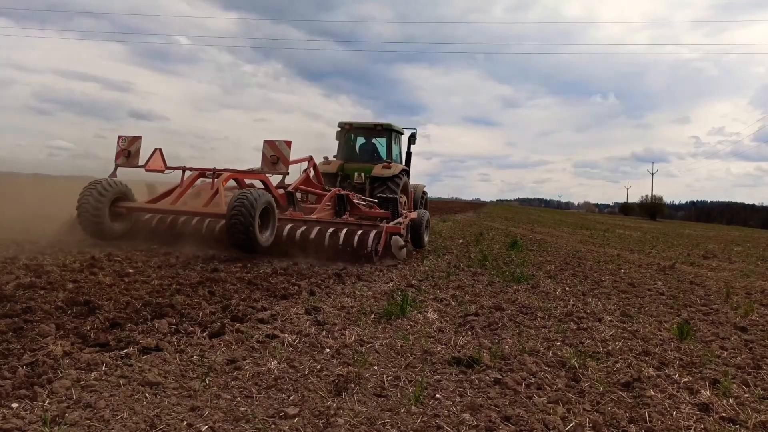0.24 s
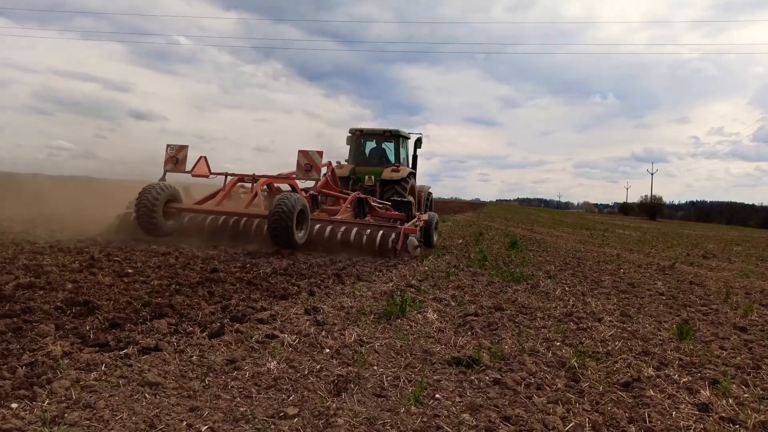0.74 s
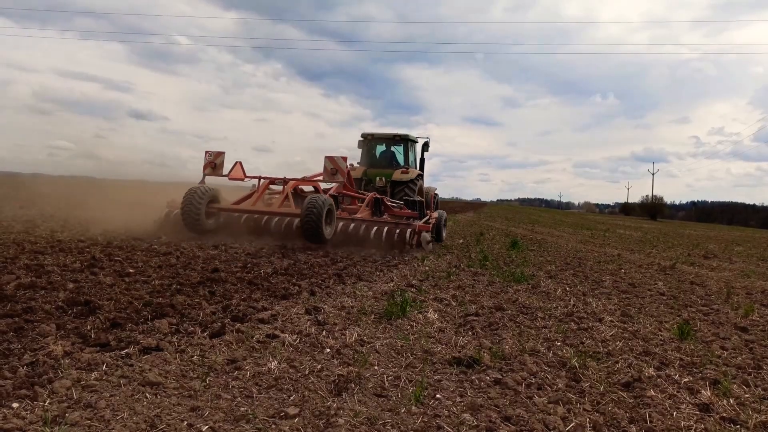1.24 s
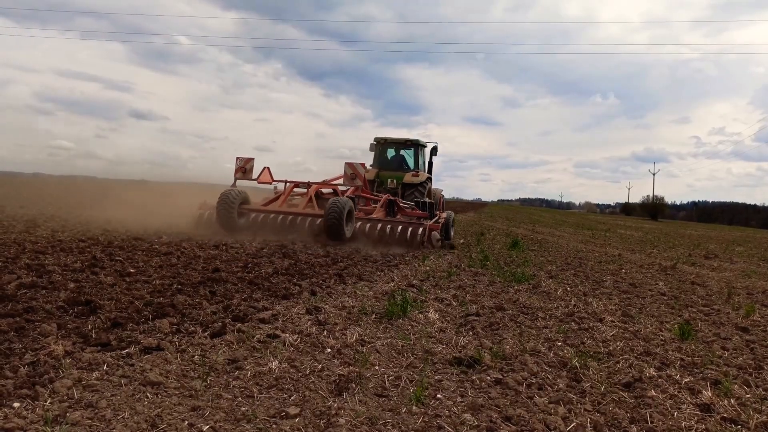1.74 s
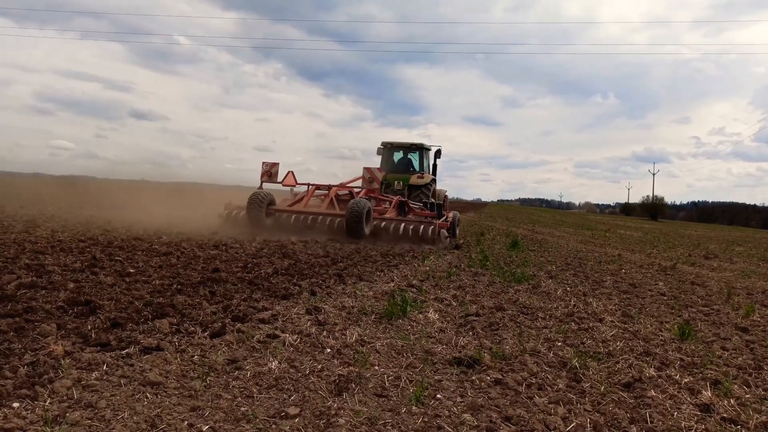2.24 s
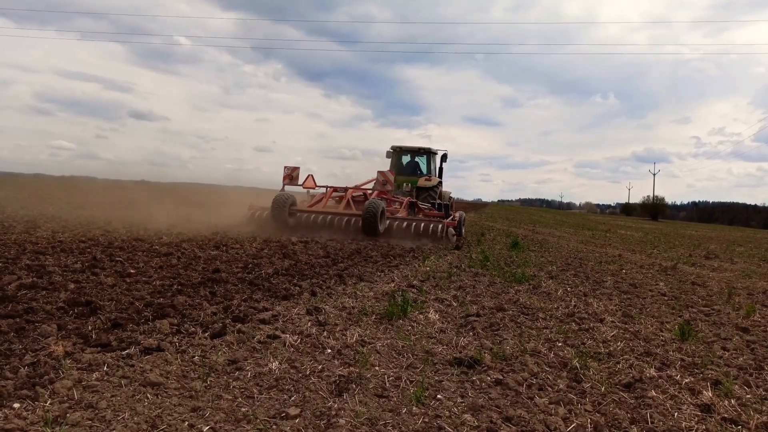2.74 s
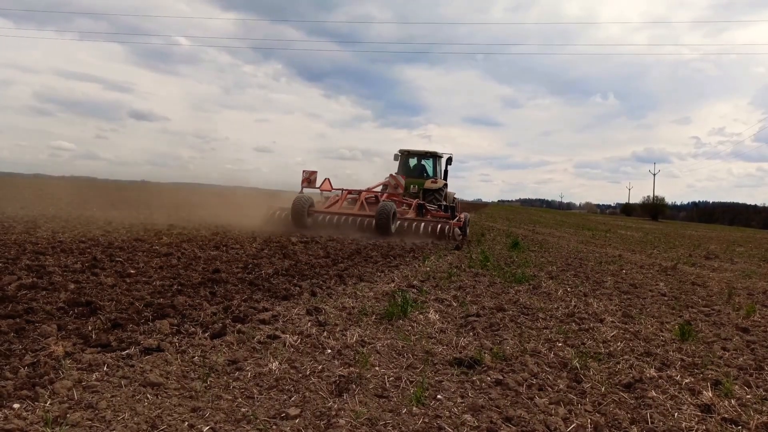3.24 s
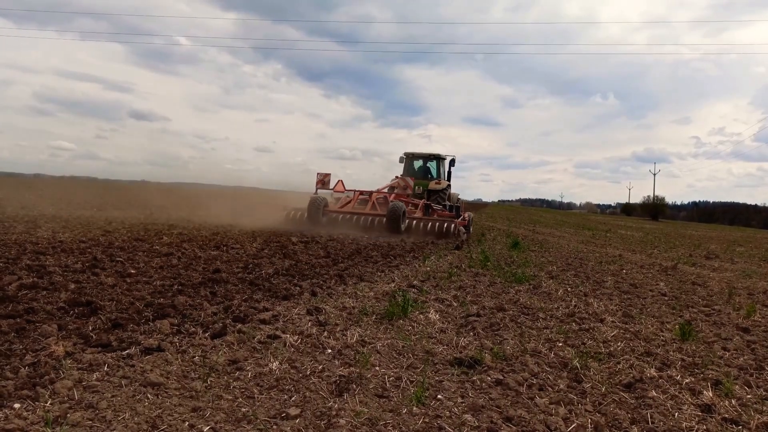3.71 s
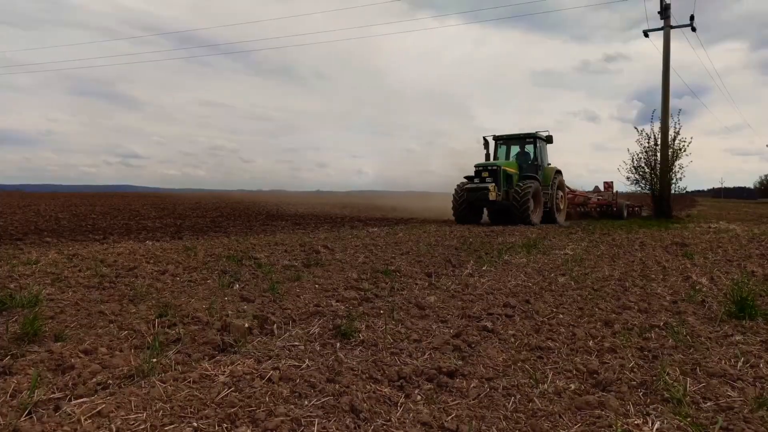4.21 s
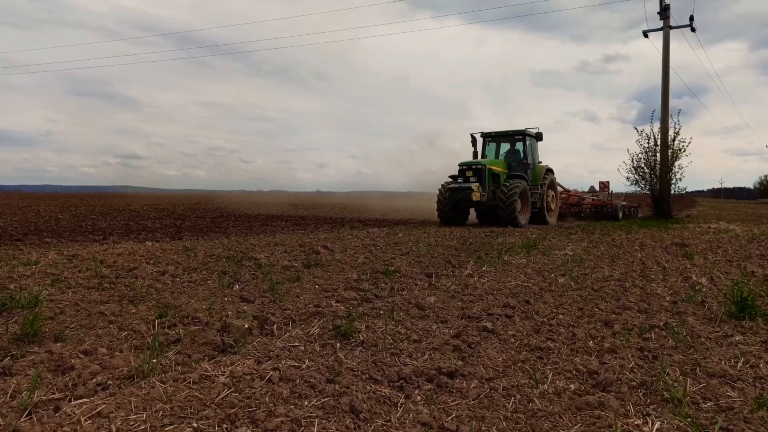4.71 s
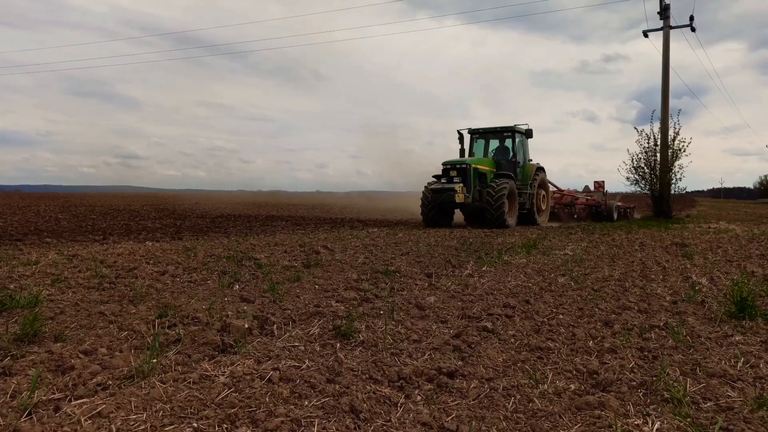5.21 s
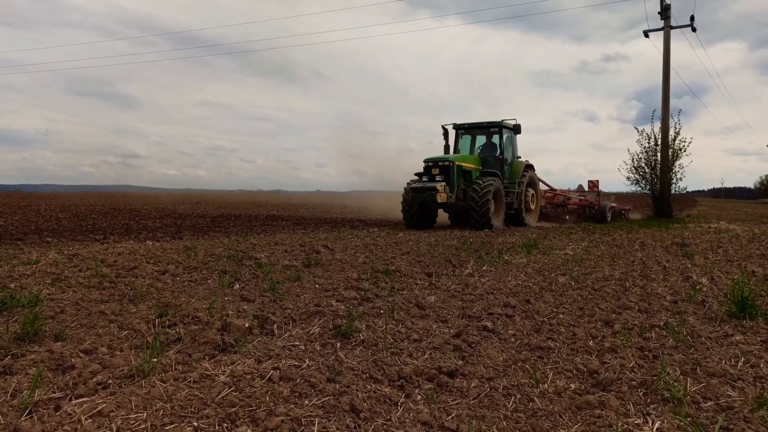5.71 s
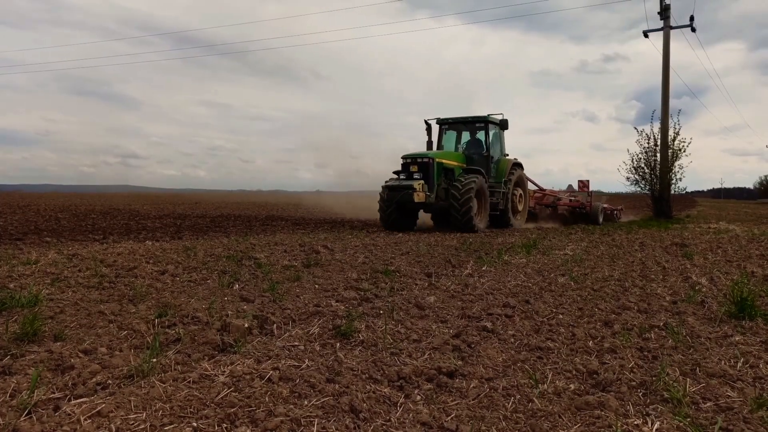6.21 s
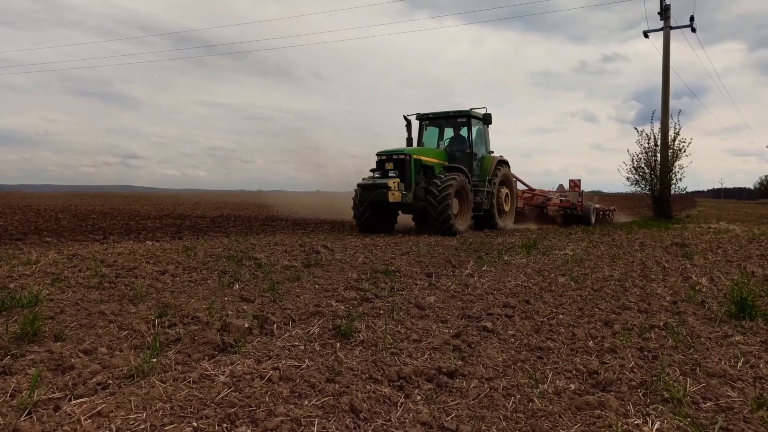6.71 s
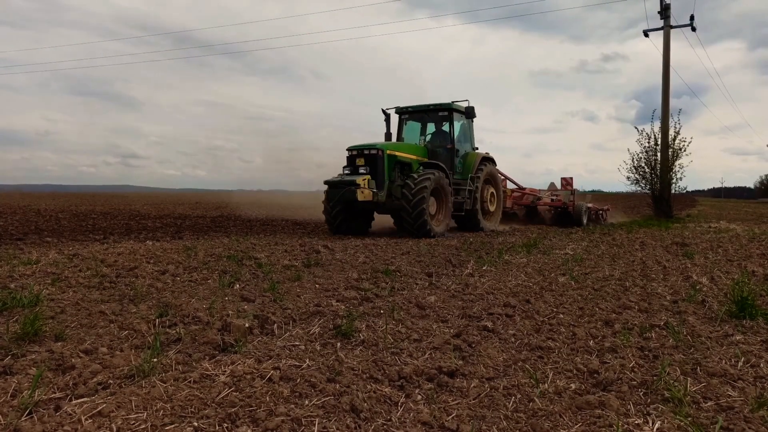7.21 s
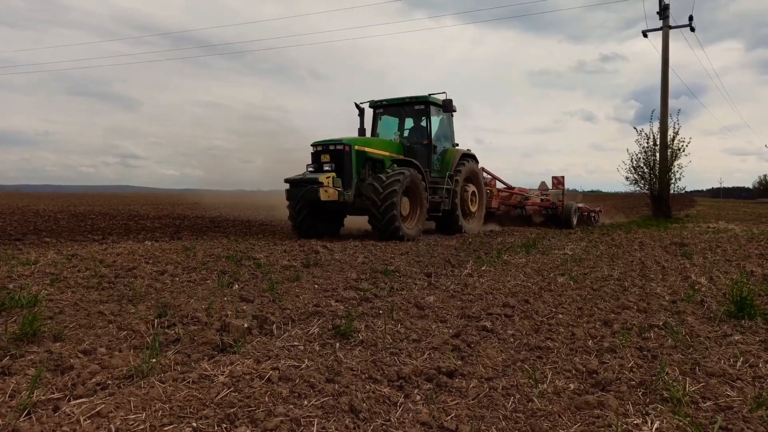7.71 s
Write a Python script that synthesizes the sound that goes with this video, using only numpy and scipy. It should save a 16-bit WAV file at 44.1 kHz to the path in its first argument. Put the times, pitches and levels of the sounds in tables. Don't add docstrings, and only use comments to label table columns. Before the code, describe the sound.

A diesel tractor drones away, stones clanking on its steel discs in buffeting wind, then after a brief silence it fades back in, approaching with a fuller roar.

```python
import sys
import numpy as np
from scipy import signal
from scipy.io import wavfile
from scipy.ndimage import uniform_filter1d

SR = 44100
rng = np.random.default_rng(int(sys.argv[2]) if len(sys.argv) > 2 else 0)


def makeup_ratio(level_db):
    decades = np.asarray(level_db, float) / 20
    return 10 ** decades


def wrap_up_sound(samples):
    columns = np.atleast_2d(samples).T
    tamed = np.clip(columns, -1, 1)
    steps = np.round(tamed * 32767).astype(np.int16)
    wavfile.write(sys.argv[1], SR, steps)


N = 350595
TIME = np.arange(N) / SR
CUT_S, BACK_S = 3.778, 4.014
LEAVING = TIME < CUT_S


def evened(x):
    return x / np.sqrt(np.mean(abs(x) ** 2) + 1e-20)


def read(points, hz):
    f, value = np.transpose(points)
    return np.interp(np.log(hz + 1), np.log(f + 1), value)


def curves(tables):
    s, *columns = np.transpose(np.vstack(tables))
    return [np.interp(TIME, s, c) for c in columns]


def wander(hz):
    low_pass = signal.butter(2, hz, fs=SR / 32, output="sos")
    steps = signal.sosfilt(low_pass, rng.standard_normal(N // 32 + 1))
    return np.interp(np.arange(N) / 32, np.arange(len(steps)), evened(steps))


def band_pass(x, low_hz, high_hz):
    return signal.sosfilt(signal.butter(2, [low_hz, high_hz], "bandpass", fs=SR, output="sos"), x)


# time in seconds, lag of the left port in samples.
LAG = [(0, 1.5), (1.5, 2), (3.7, 2), (4.1, 3.5), (5.501, 3), (6.7, -0.5), (7.2, 1), (7.901, -1.5)]
# frequency in Hz, likeness from 0 to 1.
LIKENESS = [(100, 1), (1000, 0.99), (3000, 0.79), (7000, 0.63), (13000, 0.63)]
# frequency in Hz, width in Hz, gain in dB.
PANELS = [(712, 28, 3), (1410, 35, 3), (1916, 205, 5), (2463, 43, 5.5), (2676, 37, 6), (3941, 30, 4.5),
          (4688, 46, 8)]


def noise(spectrum, like, patchy_db, size):
    frames, hz = 4 * N // size + 5, np.fft.rfftfreq(size, 1 / SR)
    a, b, c, d, patches = rng.standard_normal((frames, len(hz), 5)).T
    patches = uniform_filter1d(patches, size=len(hz) // 40, axis=0)
    patches = evened(uniform_filter1d(patches, size=8192 // size, axis=1))
    lag = np.interp(np.arange(frames) * size / 4 / SR, *np.transpose(LAG))
    same = np.clip(like * read(LIKENESS, hz), -1, 1)[:, None]
    right = a + 1j * b
    left = same * right + np.sqrt(1 - same ** 2) * (c + 1j * d)
    left = left * np.exp(-2j * np.pi * np.outer(hz, lag) / SR)
    panels_db = sum(db / (1 + ((hz - f) / width) ** 2) for f, width, db in PANELS)
    colour_db = read(spectrum, hz) + panels_db
    z = np.array([left, right]) * makeup_ratio(colour_db[:, None] + patchy_db * patches)
    return evened(signal.istft(z, nperseg=size, noverlap=3 * size // 4)[1][:, :N])


# time in seconds, level in dB.
WIND = [(0, -27.5), (.41, -31), (.61, -21.5), (.82, -32.5), (1.02, -26.5), (1.3, -30), (2.04, -27),
        (2.24, -30.5), (2.6, -26), (3.2, -24.5), (3.67, -29.5), (4.5, -29.5), (5, -32.5), (6.12, -35),
        (6.53, -29), (6.75, -35), (7.15, -34.5), (7.4, -26)]
# frequency in Hz, level in dB per Hz.
BUFFET = [(30, -22), (64, -20.5), (78, 1), (130, 3.5), (200, -1), (350, -25), (600, -35.5), (3000, -58)]
# frequency in Hz, level in dB per Hz.
GUST = [(60, -33.5), (150, -13.5), (250, 10.5), (400, -2.5), (600, -19.5), (1200, -37), (3000, -51.5)]
LAST_GUST_S, LAST_GUST_DB_PER_S = 7.58, 12.5
GUST_DB, GUST_GROWTH = -8.5, 1.5


def wind():
    buffet_db = curves([WIND])[0] + LAST_GUST_DB_PER_S * np.maximum(TIME - LAST_GUST_S, 0)
    gust_db = buffet_db + GUST_DB + (GUST_GROWTH - 1) * (buffet_db + 30)
    buffet_lumps = np.clip([wander(34), wander(11)], -3, 1.6)
    gust_lumps = np.clip([wander(30), wander(27)], -3, 1.4)
    buffeting = makeup_ratio(buffet_db + 4 + 2.2 * buffet_lumps) * noise(BUFFET, 0.029, 1.5, size=2048)
    gusts = makeup_ratio(gust_db + 1.5 + 3.9 * gust_lumps) * noise(GUST, 0.05, 2.3, size=512)
    return buffeting + gusts


# time in seconds, level in dB, length in seconds, port (1 left, -1 right).
SLAPS = [(0.074, -18.5, 0.0052, -1), (0.291, -13.5, 0.0043, -1), (0.583, -26, 0.031, 1),
         (0.871, -18.5, 0.0083, -1), (1.078, -16.5, 0.017, 1), (1.327, -21, 0.026, -1),
         (1.377, -19, 0.021, -1), (1.433, -11.5, 0.0062, -1), (1.789, -10.5, 0.006, -1),
         (1.824, -27.5, 0.0085, -1), (1.93, -23, 0.012, -1), (1.999, -20.5, 0.02, -1),
         (2.531, -14, 0.032, 1), (2.606, -10, 0.02, 1), (2.643, -12, 0.013, 1), (2.828, -15, 0.019, 1),
         (3.089, -25.5, 0.024, -1), (3.248, -18, 0.0078, 1), (3.362, -20, 0.026, -1),
         (4.571, -12.5, 0.0052, -1), (4.61, -23, 0.013, -1), (5.386, -21, 0.009, 1),
         (6.636, -20, 0.012, -1), (7.367, -10, 0.022, -1), (7.62, -13.5, 0.044, -1),
         (7.916, -9, 0.0079, -1)]
SHELTER_DB = -17.5


def wind_slaps():
    rush = band_pass(rng.standard_normal((2, N)), 190, 500)
    rush /= np.sqrt(uniform_filter1d(rush ** 2, size=500))
    swells = np.zeros((2, N))
    for s, db, length, port in SLAPS:
        near = slice(round((s - 3 * length) * SR), round((s + 3 * length) * SR))
        ports = makeup_ratio(db - 1.35 + SHELTER_DB * np.array([[port < 0], [port > 0]]))
        swells[:, near] += ports * np.exp(-((TIME[near] - s) / (0.92 * length)) ** 2)
    return swells * rush


# frequency in Hz, level in dB, decay by 60 dB in seconds.
DISC = [(1935, -5, 0.1), (2600, -1.5, 0.091), (3100, -4.5, 0.23), (3795, -3, 0.11), (4100, -1.5, 0.18),
        (4450, -12, 0.054), (4520, -4.5, 0.18), (5500, -5.5, 0.1), (6480, -11, 0.4), (6300, -18, 0.053),
        (7720, -3.5, 0.15)]
PEBBLES_PER_S, PEBBLE_DECAY = 26, 0.22


def pebbles():
    t, out = np.arange(2500) / SR, np.zeros((2, N))
    struck = rng.random(N) < PEBBLES_PER_S / SR
    size = makeup_ratio(3.5 * np.minimum(rng.exponential(1, N), 3)) * struck
    for hz, db, t60 in DISC:
        for spread in (0.9, 1.08):
            ring = makeup_ratio(db - 60 * t / (PEBBLE_DECAY * t60)) * np.sin(2 * np.pi * hz * spread * t)
            ring *= np.minimum(t / 0.0026, 1)
            ticks = signal.oaconvolve(size * rng.standard_normal(N), ring)[:N]
            out += ticks * makeup_ratio(rng.uniform(-2.5, 3, (2, 1)))
    return makeup_ratio(-47.5 - 1.3 * TIME) * LEAVING * evened(out)


# time in seconds, peak in dB, loudest ring in Hz, crack against ring in dB,
# decay as a factor.
CLANKS = [(0.0144, -22.5, 3150, 3.5, 0.65), (0.0458, -27, 3980, -1.5, 0.95), (0.225, -47.5, 1980, 17, 0.66),
          (0.3065, -26.5, 6580, 1.5, 0.6), (0.4362, -23.5, 2490, -8.5, 0.65), (0.6145, -27, 2770, 1, 0.85),
          (0.8622, -13, 2370, -9.5, 0.34), (0.9485, -25, 3970, 3, 0.74), (1.2336, -26.5, 6350, -3, 0.6),
          (1.2522, -26, 4340, 4, 0.82), (1.3514, -8, 4420, -6.5, 0.6), (1.3619, -7, 3894, -8.5, 0.5),
          (1.4997, -35.5, 7220, 9, 0.74), (1.6854, -25.5, 2035, -5.5, 0.98),
          (1.6989, -30.5, 2100, 13, 0.98), (1.7143, -21, 2300, -2, 0.98), (1.8893, -44.5, 1800, 10.5, 0.47),
          (2.0004, -34, 2400, 9.5, 0.49), (2.1821, -19.5, 2590, -16.5, 0.37),
          (2.4542, -26.5, 3740, -12.5, 0.6), (2.5024, -23, 2576, -7.5, 0.75),
          (2.9938, -22, 3670, 0.5, 0.36), (3.1515, -29.5, 3800, 3, 0.6), (3.185, -25, 3200, -10.5, 0.42)]
WING_DB, WING_PAST_S, AHEAD_DB = 16, 0.37, -2


def stone_clanks():
    out, t = np.zeros((2, N)), np.arange(9000) / SR
    hz, mode_db, t60 = np.transpose(DISC)[:, :, None]
    soft_db = -2.5 * np.log2(hz / 4000).clip(0)
    for s, db, own_hz, crack_db, decay in CLANKS:
        pan_db = WING_DB if s < WING_PAST_S else AHEAD_DB
        chance = rng.random((2, len(DISC), 1))
        detuned_hz = hz * (1 + 0.05 * (chance[1] - 0.5))
        ring_db = mode_db + soft_db - 10 * chance[0] - 60 * t / t60 / decay
        rings = makeup_ratio(ring_db) * np.sin(2 * np.pi * detuned_hz * t)
        own = makeup_ratio(-60 * t / (0.13 * decay)) * np.sin(2 * np.pi * own_hz * t)
        rubble = rng.standard_normal((2, len(t)))
        crack = band_pass(rubble + 0.33 * rubble[::-1], 1700, 7500)
        crack *= makeup_ratio(crack_db + 8 - 60 * t / (0.1 * decay))
        ports = makeup_ratio(db - 7 + np.array([[0.5], [-0.5]]) * pan_db)
        hit = (rings.sum(0) + own + crack) * np.minimum(t / 0.0016, 1) * ports
        out[:, round(s * SR):][:, :len(t)] += hit
    return out


# start in seconds, length in seconds, pitch in Hz, level in dB,
# octave level in dB.
SQUEAKS = [
    (0.42, .09, 2620, -36.5, -50),
    (.44, .065, 3100, -40.5, -57),
    (1.37, 0.079, 3100, -37, -53.5),
    (1.557, 0.065, 2582, -35.5, -55),
    (1.67, .05, 2170, -27, -34),
    (.14, .03, 1600, -45, -48.5),
    (2.101, 0.034, 3800, -41, -37),
    (2.09, 0.046, 4400, -43, -61),
    (3.262, .035, 3850, -42, -60),
]


def squeaks():
    out = np.zeros(N)
    for s, length, pitch_hz, db, octave_db in SQUEAKS:
        swell = np.sin(np.pi * np.clip((TIME - s) / length, 0, 1)) ** 0.6
        spin = 2 * np.pi * pitch_hz * (TIME - s) + 0.2 * wander(40)
        out += swell * (makeup_ratio(db) * np.sin(spin) + makeup_ratio(octave_db) * np.sin(2 * spin))
    return out


# frequency in Hz, level in dB per Hz.
HISS = [(1200, -20), (2000, -1), (2900, -5.5), (4000, -4), (8000, 16.5), (16000, -9.5)]


def soil_hiss(hiss_db, beat):
    surge_db = np.where(LEAVING, 1.6, 0.8) * wander(23)
    leaving = noise(HISS, 0.45, 2.0, size=512)
    nearing = noise(HISS, 1.0, 3.2, size=512)
    return makeup_ratio(hiss_db + 1.5 + surge_db) * np.where(LEAVING, leaving, nearing) * np.sqrt(beat)


# frequency in Hz, level in dB per Hz.
ROAR = [
    [(40, -12), (65, -5.5), (100, 5), (200, 7), (300, -2.5), (400, 4.5), (560, -2.5), (740, 1.5),
     (1000, -1.5), (1200, -9.5), (1430, -7.5), (1750, -14.5), (2900, -16.5), (8000, -19)],
    [(40, -4), (65, -8.5), (120, 0), (200, -4.5), (280, -0.5), (400, 1), (560, -1.5), (740, 3), (1120, -1),
     (1430, 0), (1750, -5.5), (2700, -7), (3000, -9), (8000, -14)],
]


def engine_roar(beat):
    leaving = makeup_ratio(6) * noise(ROAR[0], 1.0, 0.79, size=1024)
    nearing = makeup_ratio(4) * noise(ROAR[1], 1.0, 0.88, size=1024)
    return np.where(LEAVING, leaving, nearing) * beat


# multiple of the firing rate, level leaving in dB,
# level approaching in dB, both against the firing tone.
CRANK = [(0.832, -33.5, -36), (1.167, -34, -26), (1.333, -17, -27.5), (1.5, -30.5, -14), (1.667, -24, -17),
         (1.833, -15, -19.5), (2.167, -43.5, -21.5), (2.5, -28, -22.5), (3, -32, -36), (4.5, -26.5, -23.5),
         (4.167, -24, -36.5), (2.333, -21, -21), (4, -28, -36.5)]


def exhaust_tones(firing_hz, tone_db, octave_db):
    turns = np.cumsum(firing_hz * (1 + 0.0017 * wander(13.7))) / SR
    out = makeup_ratio(tone_db + 0.31 * wander(16)) * np.cos(2 * np.pi * turns)
    out += makeup_ratio(octave_db + 1.03 * wander(4.2)) * np.cos(4 * np.pi * turns - 0.45)
    for order, behind_db, front_db in CRANK:
        level_db = tone_db + np.where(LEAVING, behind_db, front_db) + 1.3 * wander(2.66)
        phase = rng.random() + 0.054 * wander(3.7)
        out += makeup_ratio(level_db) * np.cos(2 * np.pi * (order * turns + phase))
    return np.sqrt(2) * out, turns


# time in seconds, firing rate in Hz, firing tone in dB,
# soil hiss against roar in dB.
DRIVE = [
    [(0, 87.24, -22, -9.5), (.3, 87.1, -18.5, -7), (.8, 89.7, -21, -6.5), (1.15, 86.6, -18, -6.5),
     (1.5, 90.6, -20, -7), (1.85, 87.8, -21.5, -13), (2.6, 89, -21.5, -17), (3.05, 90.6, -23, -19),
     (3.77, 87.43, -23, -13.5)],
    [(4.05, 81.64, -17.5, -4), (4.3, 78.6, -17, -3.5), (4.85, 79.77, -16.5, -6.5), (5.48, 85.27, -14.5, -7),
     (5.95, 92.44, -14, -11), (6.42, 91.1, -15.5, -9.5), (7.0, 86.14, -13.5, -15.5), (7.4, 87, -15, -3),
     (7.7, 85.24, -13, -3.5)],
]
LEAVE_DB, LEAVE_DB_PER_S = -32.5, -1.08
NEAR_DB, NEAR_DB_PER_S, HELD_DB = -27.5, 2.5, -23
OCTAVE_DB, BEHIND_DB, KNEE_HZ, OCTAVE_DB_PER_HZ = -5, 2, 88.6, -2.5


def tractor():
    firing_hz, tone_db, hiss_db = curves(DRIVE)
    slope = np.where(LEAVING, 0.4, 1) * OCTAVE_DB_PER_HZ
    octave_db = tone_db + OCTAVE_DB + BEHIND_DB * LEAVING + slope * np.maximum(firing_hz - KNEE_HZ, 0)
    nearing_db = np.minimum(NEAR_DB + NEAR_DB_PER_S * (TIME - BACK_S), HELD_DB)
    roar_db = np.where(LEAVING, LEAVE_DB + LEAVE_DB_PER_S * TIME, nearing_db)
    tones, turns = exhaust_tones(firing_hz, tone_db, octave_db)
    beat = 1 + 0.14 * np.cos(2 * np.pi * turns) + 0.037 * np.cos(np.pi * turns)
    return tones + makeup_ratio(roar_db) * (engine_roar(beat) + soil_hiss(hiss_db, beat))


def scene():
    return wind() + wind_slaps() + pebbles() + stone_clanks() + squeaks() + tractor()


# time in seconds, depth in dB, recovery in seconds.
DUCKS = [
    (7.358, 9.5, 0.18),
    (7.623, 8, 0.33),
]


def limiter(dry):
    dip_db = sum(depth * np.clip(1 - (TIME - s) / back, 0, 1) * (TIME > s) for s, depth, back in DUCKS)
    dipped = dry * makeup_ratio(-np.outer([0, 1], uniform_filter1d(dip_db, size=300)))
    wind_filter = signal.butter(4, 29, "highpass", fs=SR, output="sos")
    thinned = signal.sosfilt(wind_filter, dipped) + makeup_ratio(-16) * dipped
    return 0.95 * np.tanh(thinned / 0.95)


# lower edge in Hz, left gain in dB, right gain in dB, share of patches kept.
TREBLE_STEPS = [(0, -1, 0, 0.99), (4500, 4, -8.5, 0.92), (4726, -8, -3.5, 1), (6110, 0.1, -1.6, 0.85),
                (7830, 7, 6, 0.95), (7670, -4, -8.5, 0.93), (8475, -10.5, -12.5, 0.33), (9324, -16.5, -13.5, .1),
                (9950, -18, -24.5, 0.013), (11494, -12, -9, 0.84), (12260, -13, -12.5, .4),
                (12900, -8.5, -6.5, .35), (14300, -9.5, -18, .12), (15500, -76.5, -87.5, 0.9)]


def stepped_treble(limited):
    hz, t, z = signal.stft(limited, SR, nperseg=1024, noverlap=768)
    edge_hz, left_db, right_db, kept = np.transpose(TREBLE_STEPS)
    band = np.searchsorted(edge_hz, hz, "right") - 1
    luck = uniform_filter1d(rng.standard_normal(z.shape[1:]), size=6, axis=0)
    luck = evened(uniform_filter1d(luck, size=11, axis=1))
    treble_db = 10 * np.log10((abs(z[:, hz > 6000]) ** 2).mean((0, 1)) + 1e-12)
    rise = evened(treble_db - uniform_filter1d(treble_db, size=120))
    shared_luck = evened(uniform_filter1d(rng.standard_normal(len(t)), size=16))
    luck = evened(luck - 0.2 * rise + 0.6 * shared_luck)
    share = 1 / (1 + np.exp(-1.7 * luck))
    after_fade = abs(t - 4.85) < 0.75
    starved = (hz > 8400)[:, None] | ((hz > 4800)[:, None] & after_fade)
    allowed = kept[band][:, None] * np.where(t < CUT_S, 1.1, 0.9)
    mask = np.where(starved, np.clip((allowed - share) * 40, 0, 1), 1)
    z = z * mask * makeup_ratio(np.array([left_db, right_db])[:, band, None])
    return signal.istft(z, SR, nperseg=1024, noverlap=768)[1][:, :N]


def roll_off(x):
    return signal.sosfilt(signal.butter(12, 15720, fs=SR, output="sos"), x)


def record(dry):
    coloured = stepped_treble(limiter(dry))
    cut = makeup_ratio(-np.clip(TIME - CUT_S, 0, 1) * 4700)
    fade_in = np.clip(0.052 + (TIME - BACK_S) / 0.31, 0, 1)
    mix = coloured * np.where(TIME < BACK_S, cut, fade_in)
    return roll_off(mix)


dry = scene()
out = record(dry)
wrap_up_sound(out)
```